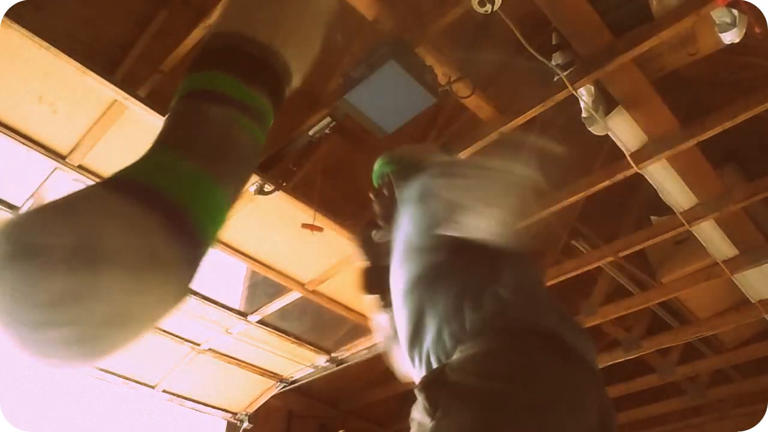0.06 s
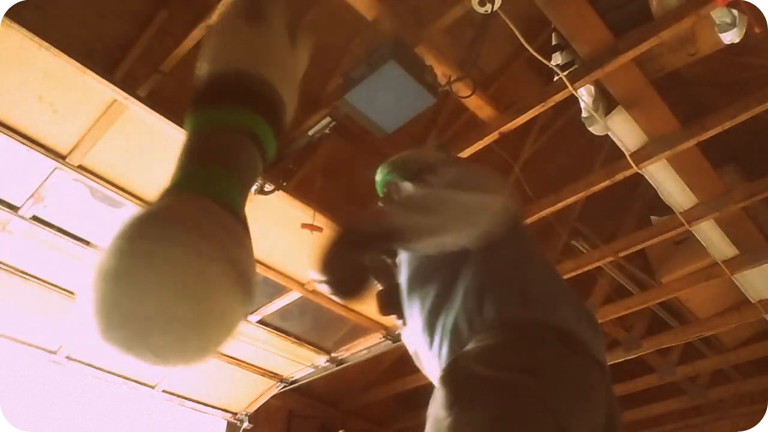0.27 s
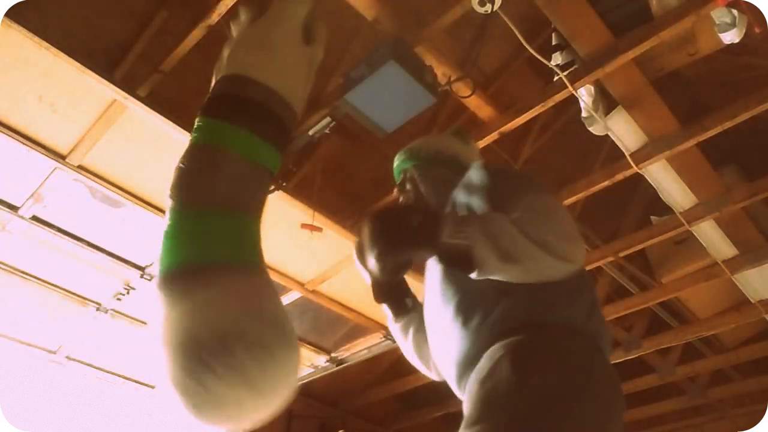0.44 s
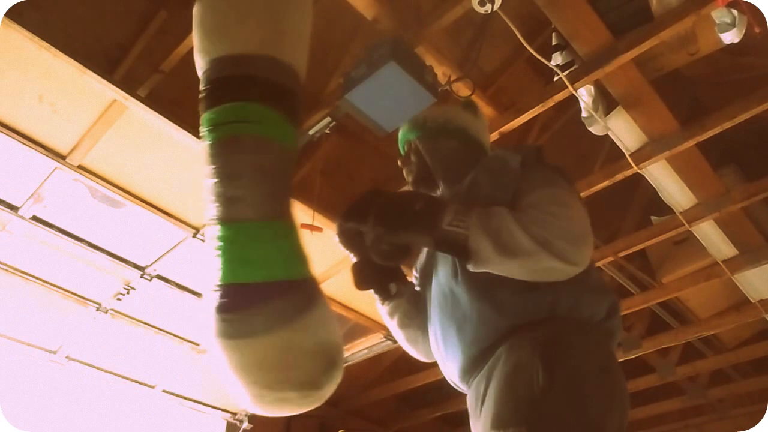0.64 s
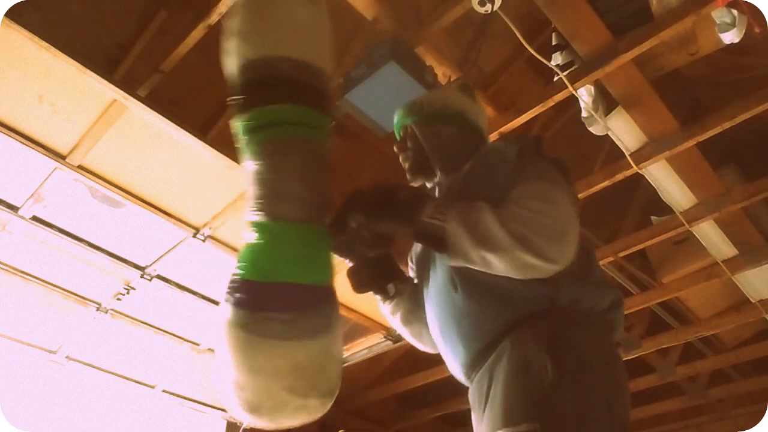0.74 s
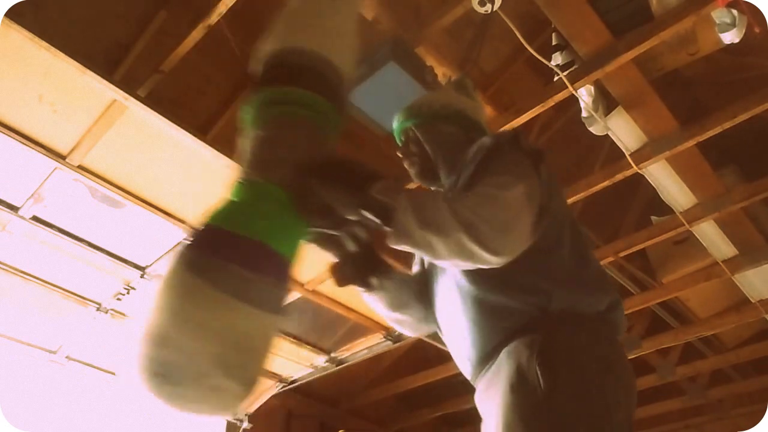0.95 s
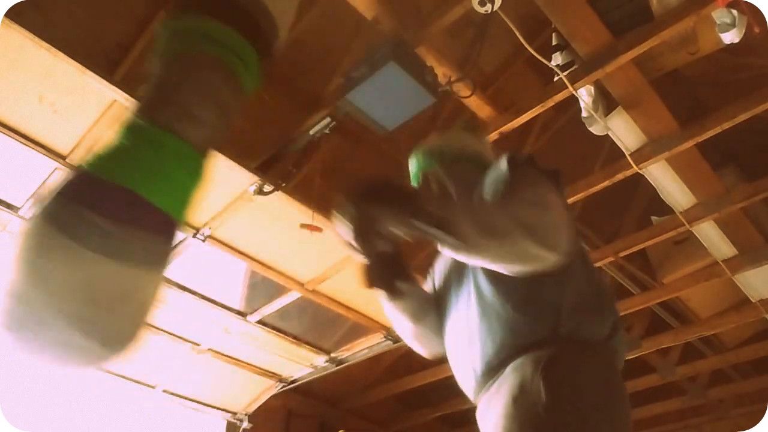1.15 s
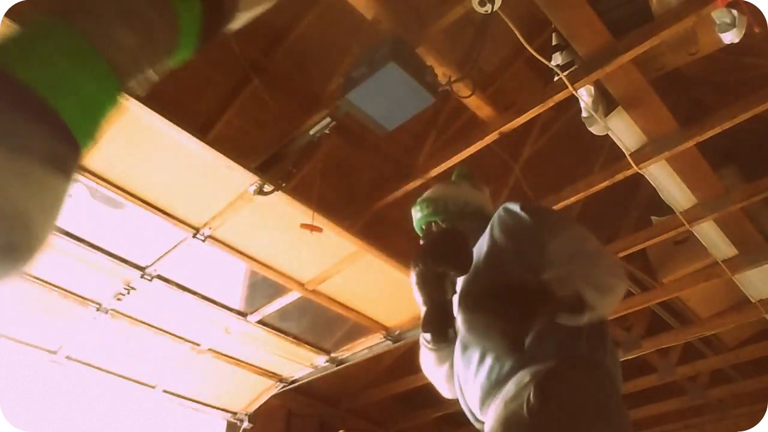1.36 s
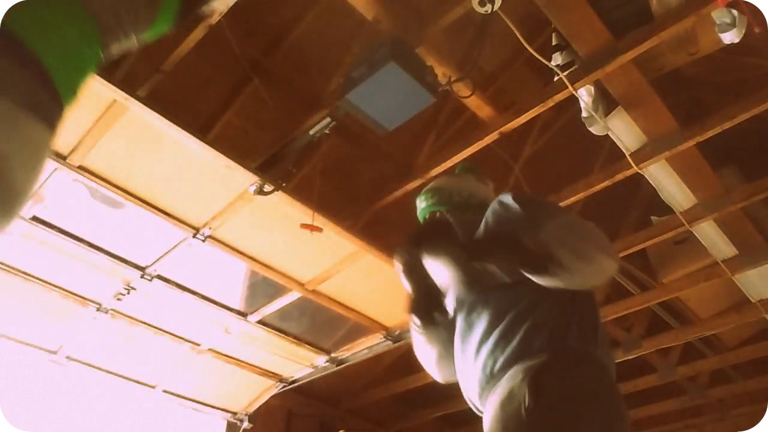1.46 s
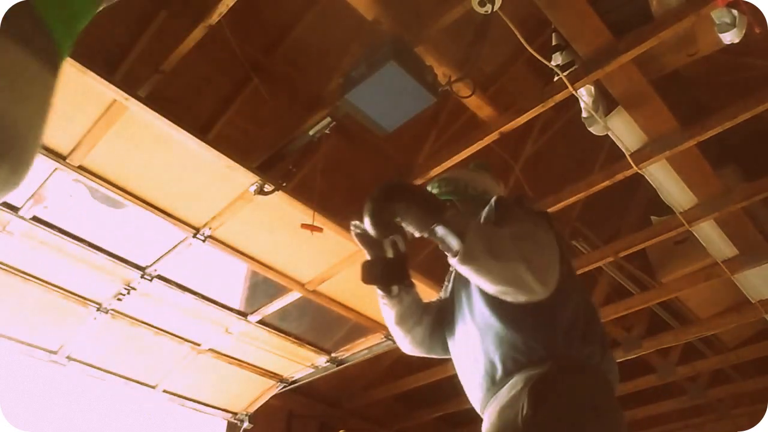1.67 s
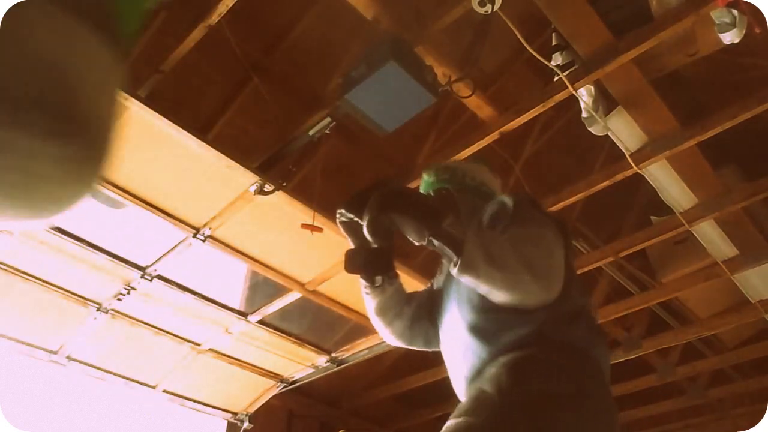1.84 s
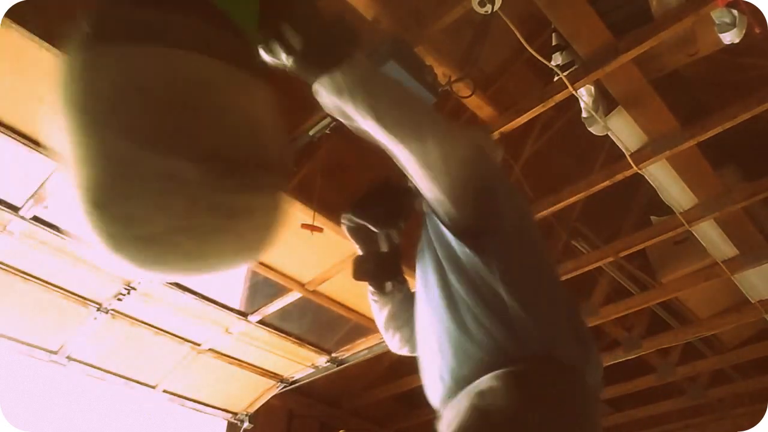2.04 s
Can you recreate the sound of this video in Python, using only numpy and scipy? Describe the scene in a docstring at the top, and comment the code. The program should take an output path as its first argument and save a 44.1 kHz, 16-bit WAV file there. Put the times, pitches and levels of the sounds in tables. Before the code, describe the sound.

One hard punch hits a hanging heavy bag with a slap and a thud that booms through a bare garage. As the bag swings, its hanger creaks and the chain clinks, over faint shoe scuffs and rustling clothes.

```python
"""A bare, ringing garage: one hard punch lands on a hanging heavy bag.
A sleeve flaps on the way in; the glove slaps the cover, the bag thuds and the room booms,
with a low bump just after the hit. Then the bag swings: the hanger creaks and ticks, the chain clinks
and the cover crinkles. Underneath, shoes scuff on concrete and clothes rustle over dull room tone."""
import sys
import numpy as np
from scipy import signal
from scipy.fft import rfft, irfft
from scipy.io import wavfile

SR = 44100
rng = np.random.default_rng(int(sys.argv[2]) if len(sys.argv) > 2 else 0)


def store_wav(level_fs):
    """Save 16-bit WAV to argv[1]."""
    pcm = np.round(np.clip(np.atleast_2d(level_fs), -1, 1) * 32767)
    wavfile.write(sys.argv[1], SR, pcm.T.astype(np.int16))


N = 92610
T = np.arange(N) / SR
BIN_HZ = np.arange(N // 2 + 1) * SR / N
PUNCH_S, ROOM_DELAY_S = .2484, .014


def amp(db):
    """Decibels to gain."""
    return 10 ** (np.asarray(db) / 20)

def unit_rms(x):
    """Scale to rms 1."""
    return x / np.sqrt(np.mean(x ** 2) + 1e-20)

def at_hz(curve, hz):
    """Read a curve on a log-frequency axis."""
    freqs, values = np.transpose(curve)
    return np.interp(np.log(hz + 1e-9), np.log(freqs), values)

def colour(x, eq):
    """Shape x with an EQ curve, rolled off below its lowest point; rms 1."""
    skirt = np.minimum(BIN_HZ / eq[0][0], 1) ** 2
    return unit_rms(irfft(rfft(x) * amp(at_hz(eq, BIN_HZ)) * skirt, N))

def fade(t, t60):
    """Full level until t = 0, then an exponential decay."""
    return np.exp(-np.log(1000) * np.minimum(np.maximum(t, 0) / t60, 10))

def burst(start, length, attack, t60):
    """Attack, hold and release envelope; times in seconds."""
    return np.clip((T - start) / attack, 0, 1) * fade(T - start - length, t60)

def bursts(cues, attack=.0023, t60=.036):
    """One envelope with a burst for every cue."""
    return sum(amp(db) * burst(start, length, attack, t60) for start, length, db in cues)

def friction(eq, per_s, hiss):
    """Random stick-slip snaps over smooth hiss, in the colour of one material; rms 1."""
    snaps = (rng.random(N) < per_s / SR) * rng.choice([-1, 1], N) * rng.uniform(.99, 1, N)
    return colour(unit_rms(snaps) + hiss * rng.standard_normal(N), eq)

def ring(modes, start):
    """Struck resonances: decaying sines that start together."""
    t = np.maximum(T - start, 0)
    return sum(amp(db) * np.sin(2 * np.pi * hz * t) * fade(t, t60) for hz, db, t60 in modes)

def rubbed_mode(hz, width):
    """One resonance driven by friction noise; rms 1."""
    radius = np.exp(-np.pi * width / SR)
    feedback = [1, -2 * radius * np.cos(2 * np.pi * hz / SR), radius ** 2]
    return unit_rms(signal.lfilter([1, 0, -1], feedback, rng.standard_normal(N)))


# the room's resonant peaks: (frequency [Hz], lift above the valleys [dB], width [Hz])
ROOM_PEAKS = [(171, 5.5, 29), (214.4, 4.5, 16), (445, 3.5, 23), (518, 6, 19), (730, 5, 24), (823, -0.5, 30),
              (957, 1, 59)]
def standing_waves(x, valley_db=-2):
    """The room lifts its own pitches and thins what lies between."""
    lift_db = sum(db / (1 + (2 * (BIN_HZ - hz) / width) ** 2) for hz, db, width in ROOM_PEAKS)
    return irfft(rfft(x) * amp(valley_db + lift_db), N)

# room tone EQ: (frequency [Hz], gain [dB])
ROOM_TONE_EQ = [(30, -17), (87, -1), (195, -4.5), (394, -0.5), (485, 2), (597, -3), (905, -3),
                (2700, -16.5), (6200, -21.5), (10400, -41), (15000, -29.5)]
# its fader ride: (time [s], level [dB])
ROOM_TONE_RIDE = [(0, -48.5), (1.0, -50), (1.4, -50), (1.75, -56.5), (2.0, -54.5), (2.1, -48.5)]
def room_tone():
    """A bed of dull noise, tinted by the standing waves."""
    level = amp(np.interp(T, *np.transpose(ROOM_TONE_RIDE)))
    return level * standing_waves(colour(rng.standard_normal(N), ROOM_TONE_EQ))

# cloth EQ: (frequency [Hz], gain [dB])
CLOTH_EQ = [(900, -0.5), (2500, 1), (6200, 1), (7500, -6), (9500, -8.5), (13000, -16)]
# its fader ride: (time [s], level [dB])
CLOTH_RIDE = [(0, -50.5), (.15, -56), (.8, -60.5), (1.0, -55), (1.15, -59), (1.25, -60.5), (1.42, -59),
              (1.6, -52.5), (1.75, -57), (1.87, -65), (2.1, -76)]
def clothes():
    """Cloth rubs on cloth in a soft, continuous rustle."""
    level = amp(np.interp(T, *np.transpose(CLOTH_RIDE)))
    return level * friction(CLOTH_EQ, per_s=240, hiss=3.6)

# the garage's reverb time: (frequency [Hz], t60 [s])
REVERB_DECAY = [(50, 0.96), (120, 0.7), (250, 1), (500, 0.81), (900, 0.68), (1800, 0.73), (3500, 0.56),
                (6500, 0.53), (10000, 0.41), (15000, 0.72)]
def reverb_tail(start, eq):
    """The garage's answer to an impulse: diffuse noise that builds up and dies band by band."""
    white = rfft(rng.standard_normal(N))
    edges = np.geomspace(40, 18000, 33)
    tail = 0
    for low, high in zip(edges, edges[1:]):
        centre = np.sqrt(low * high)
        build_s = .0013 + 1.4 / centre   # low notes take longer to fill the room
        band = irfft(white * (BIN_HZ >= low) * (BIN_HZ < high), N)
        band *= burst(start + ROOM_DELAY_S, 0, build_s, at_hz(REVERB_DECAY, centre))
        impulse_share = np.sqrt(2 * (high - low) / SR / N)
        tail += unit_rms(band) * amp(at_hz(eq, centre)) * impulse_share
    return tail

# reverb EQ for the small sounds: (frequency [Hz], gain [dB])
FOLEY_REVERB_EQ = [(100, 2.5), (500, -2.5), (1500, -0.5), (3500, -6.5), (6500, -2), (11000, -4),
                   (15000, -8)]
def foley_reverb(foley):
    """Small sounds wash around the bare walls and pick up the room's pitches."""
    return standing_waves(signal.fftconvolve(foley, reverb_tail(0, FOLEY_REVERB_EQ))[:N])

# shuffles on concrete: (time [s], length [s], level [dB], rasp pitch [Hz])
SCUFFS = [(.001, 0.0098, -39, 1115), (0.951, 0.042, -43.5, 1360), (1.275, 0.053, -51, 910),
          (1.432, 0.051, -51.5, 1265), (1.532, 0.017, -42, 940), (1.553, 0.053, -53, 826),
          (1.82, 0.062, -54, 1520)]
# grit EQ: (frequency [Hz], gain [dB])
GRIT_EQ = [(180, 5.5), (280, 2), (500, 10.5), (900, 4.5), (1400, -3), (2200, -9.5), (6000, -31)]
def shoes(attack=.011, t60=.044):
    """Rubber soles slide over grit, each slide with its own rasp; one pivots with a faint squeal."""
    grit = friction(GRIT_EQ, per_s=640, hiss=.51)
    slides = 0
    for start, length, db, hz in SCUFFS:
        rasp = amp(-5) * rubbed_mode(hz, width=110)
        slides += amp(db) * burst(start, length, attack, t60) * (grit + rasp)
    pivot = amp(-58) * burst(1.44, .078, attack, t60) * rubbed_mode(hz=1326, width=40)
    return slides + pivot

# soft bumps: (time [s], length [s], level [dB])
KNOCKS = [(.862, 0.003, -42), (.949, 0.0035, -35), (1.615, 0.0015, -40.5), (1.632, 0.0024, -45.5),
          (1.745, 0.07, -55), (2.085, 0.006, -44.5)]
# their muffled EQ: (frequency [Hz], gain [dB])
KNOCK_EQ = [(150, -3), (220, 13.5), (500, 4.5), (1000, 1), (3000, -33)]
def knocks():
    """Feet and gloves knock softly: quick, dull puffs of noise."""
    return bursts(KNOCKS, attack=.00062, t60=.039) * friction(KNOCK_EQ, per_s=3700, hiss=.93)

# crinkles of the cover: (time [s], length [s], level [dB])
CRINKLES = [(.076, 0.0033, -48.5), (.562, 0.022, -40), (.607, 0.057, -41), (.852, 0.064, -51),
            (.862, 0.0011, -44), (.948, 0.0032, -42.5), (1.172, 0.0033, -51), (1.235, 0.033, -55),
            (1.51, 0.044, -47.5), (1.615, 0.002, -40), (1.632, 0.0031, -55), (1.927, 0.0043, -50.5),
            (2.05, 0.034, -57), (2.086, 0.012, -49)]
# their crisp EQ: (frequency [Hz], gain [dB])
CRINKLE_EQ = [(1500, -1.5), (4000, -0.5), (6300, 8), (9000, -4), (12000, -6), (15500, -3.5)]
def bag_cover():
    """The cover crinkles in dense runs of bright snaps."""
    return bursts(CRINKLES, attack=.0011) * friction(CRINKLE_EQ, per_s=3300, hiss=.64)

# swivel squeaks: (time [s], length [s], level [dB])
SQUEAKS = [(1.529, .014, -46), (1.616, 0.0058, -45)]
# swivel resonances: (frequency [Hz], relative level [dB], width [Hz])
SWIVEL_MODES = [(3020, -5, 90), (5580, 4, 77), (5850, -4, 120)]
def swivel():
    """The swivel rubs and squeaks in its hook; the hook pings once."""
    squeal = unit_rms(sum(amp(db) * rubbed_mode(hz, width) for hz, db, width in SWIVEL_MODES))
    ping = ring([(7470, -47, .036)], start=1.102)
    return bursts(SQUEAKS) * squeal + ping

# hanger creaks and ticks: (time [s], length [s], level [dB])
CREAKS = [(.425, 0.041, -36), (.518, 0.015, -38), (.669, 0.017, -29.5), (1.631, 0.0028, -39),
          (1.681, 0.01, -47.5), (2.085, 0.0058, -44)]
# their EQ: (frequency [Hz], gain [dB])
CREAK_EQ = [(350, -47), (600, -14), (1040, -10.5), (1560, -7), (2640, -7), (3650, -2), (11600, -17.5),
            (15000, -47)]
def hanger():
    """The hanger sticks and slips under the swinging bag."""
    return bursts(CREAKS) * friction(CREAK_EQ, per_s=600, hiss=1)

# links shifting: (time [s], length [s], relative level [dB], shimmer mix [dB])
CLINKS = [(.001, .03, -59, -20), (.26, 0.018, -27, -13), (.305, 0.042, -40, -13), (0.646, .014, -46, -1),
          (0.68, 0.013, -44, -12), (0.719, .012, -56, -14), (0.774, 0.016, -58, -12),
          (1.115, 0.014, -59, -12), (1.196, 0.033, -58, -10), (1.319, 0.012, -48.5, -22),
          (1.518, 0.017, -45, -12), (1.555, 0.039, -58, -13), (1.728, 0.025, -64, -22)]
# link resonances: (frequency [Hz], relative level [dB], width [Hz])
LINK_MODES = [(10220, -19, 90), (13020, -3, 29)]
def chain(trim_db=.5):
    """Links grind on each other and ring very high, with a shimmer on top."""
    tone = sum(amp(db) * rubbed_mode(hz, width) for hz, db, width in LINK_MODES)
    shimmer = rubbed_mode(hz=14950, width=120)
    clinks = 0
    for start, length, db, shimmer_db in CLINKS:
        level = amp(db + trim_db) * burst(start, length, attack=.0037, t60=.092)
        clinks += level * (tone + amp(shimmer_db) * shimmer)
    return clinks

def low_bump():
    """Two short, low notes sound just after the hit."""
    return ring([(77.5, -30, .2), (194, -21, .2)], start=.345)

# flaps ahead of the hit: (time [s], length [s], level [dB])
FLAPS = [(.176, 0.012, -40.5), (.181, 0.0081, -38.5), (.186, 0.0064, -21.5), (.195, 0.016, -27.5),
         (.216, 0.011, -30)]
# sleeve EQ: (frequency [Hz], gain [dB])
SLEEVE_EQ = [(200, -20.5), (480, -4), (900, -17.5), (1600, -5), (2700, 1.5), (3700, 2), (5200, -5),
             (8200, -13), (11000, -21.5), (15000, -25.5)]
def sleeve():
    """The sleeve flaps as the arm shoots out."""
    return bursts(FLAPS, attack=.0078, t60=.037) * friction(SLEEVE_EQ, per_s=1300, hiss=1.8)

# early reflections: (delay [s], level [dB])
ECHOES = [(.0148, -3), (.0183, -7.5)]
def echoes(x, cutoff_hz=1600):
    """Walls and roof throw back dulled copies."""
    dull = signal.sosfilt(signal.butter(1, cutoff_hz, fs=SR, output="sos"), x)
    return sum(amp(db) * np.interp(T - delay, T, dull, left=0) for delay, db in ECHOES)

# standing waves set off by the punch: (frequency [Hz], relative level [dB], t60 [s])
BOOM_MODES = [(148, -29, .8), (229, -23, .85), (248, -24, .85), (280, -25, .85), (346, -20, .45),
              (379, -19.5, .6), (426, -16, .6), (501, -14, .72), (559, -12, .58), (628, -18, .6),
              (726, -16.5, .55), (759, -21.5, .55), (918, -23, .55), (1007, -19.5, .45), (1483, -21.5, .5),
              (1602, -26, .6)]
# reverb EQ for the punch: (frequency [Hz], gain [dB])
PUNCH_REVERB_EQ = [(50, 24), (85, 28), (130, 34), (190, 32), (250, 36.5), (320, 29), (480, 40), (680, 38),
                   (830, 27), (1000, 30.5), (1250, 26.5), (1600, 30), (2200, 25), (3200, 20.5),
                   (4400, 23.5), (6700, 25.5), (10000, 12), (15000, 7)]
def room_boom(trim_db=-4, build_s=.031):
    """The blow fills the garage: standing waves swell and ring on inside a diffuse tail."""
    start = PUNCH_S + ROOM_DELAY_S
    swell = 1 - np.exp(-np.maximum(T - start, 0) / build_s)
    return amp(trim_db) * swell * ring(BOOM_MODES, start) + reverb_tail(PUNCH_S, PUNCH_REVERB_EQ)

# the bag's thud: (frequency [Hz], level [dB], t60 [s])
BAG_MODES = [(58, -42.5, .3), (81, -41, 0.13), (119, -24.5, 0.19), (241, -46, 0.15), (455, -12.5, 0.18),
             (555.6, -10, 0.098), (710, -14, 0.088), (1000, -19, 0.047), (1360, -25.5, 0.077)]
# glove-on-cover EQ: (frequency [Hz], gain [dB])
SLAP_EQ = [(300, 5), (900, -1), (1600, -7.5), (2500, -3.5), (4200, -1.5), (6800, -2), (9500, -12),
           (12000, -11.5), (16000, -10)]
def punch(push_s=.0004):
    """The glove squeezes out a pulse of air, cracks on contact and slaps flat; the bag thuds."""
    push = amp(-6) * np.sin(np.pi * np.clip((T - PUNCH_S) / push_s, 0, 1)) ** 2
    thud = ring(BAG_MODES, PUNCH_S)
    contact_s = PUNCH_S + .00068
    crack = amp(-11) * burst(contact_s, length=0, attack=.0001, t60=.011)
    slap = amp(-11) * burst(contact_s, length=.0097, attack=.00021, t60=.025)
    return push + thud + (crack + slap) * friction(SLAP_EQ, per_s=3200, hiss=1)


def scene():
    """The mono mix: the hit, the foley around it, the room's answer and the background."""
    hit = punch()
    foley = sleeve() + hanger() + bag_cover() + knocks() + shoes() + chain() + swivel()
    room = echoes(hit) + room_boom() + foley_reverb(foley)
    return (hit + low_bump() + foley + room + clothes() + room_tone())[None]

def record(dry, ceiling=1.1):
    """The microphone loses the deepest bass and overloads on the blow; the top is cut."""
    low_cut = signal.butter(8, 46, "high", fs=SR, output="sos")
    high_cut = signal.cheby2(16, 70, 16600, fs=SR, output="sos")
    saturated = ceiling * np.tanh(signal.sosfilt(low_cut, dry) / ceiling)
    return signal.sosfilt(high_cut, saturated)


dry = scene()
out = record(dry)
store_wav(out)
```